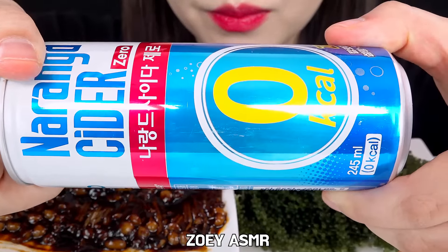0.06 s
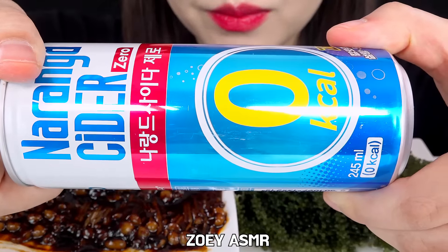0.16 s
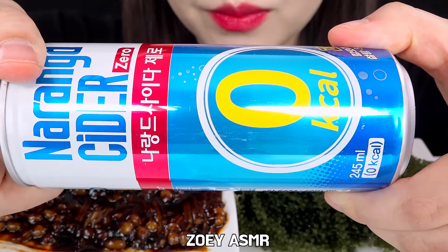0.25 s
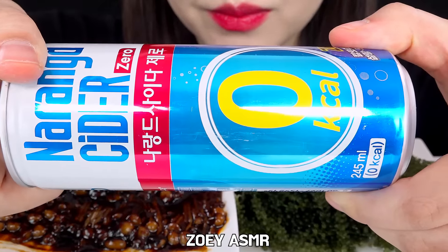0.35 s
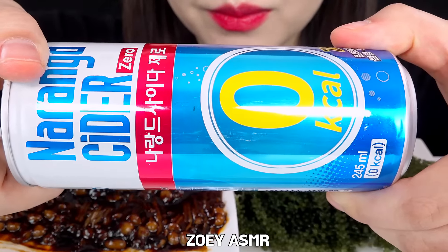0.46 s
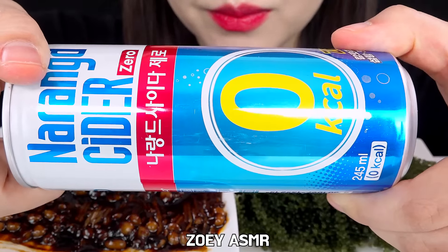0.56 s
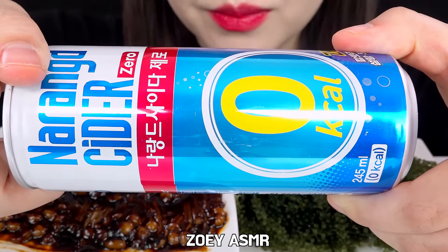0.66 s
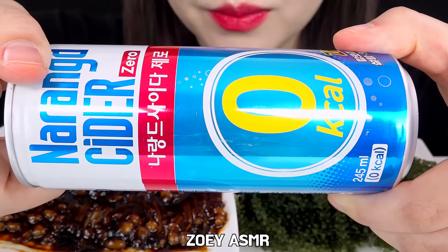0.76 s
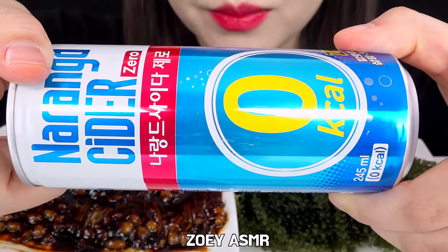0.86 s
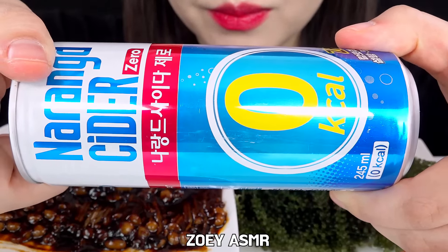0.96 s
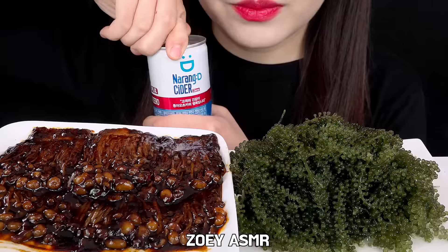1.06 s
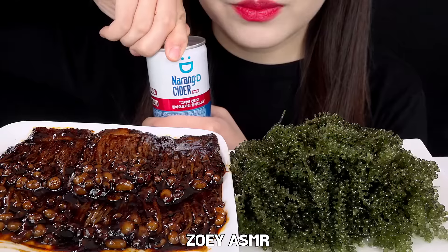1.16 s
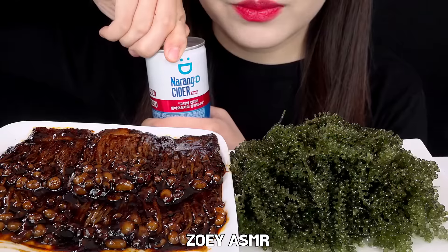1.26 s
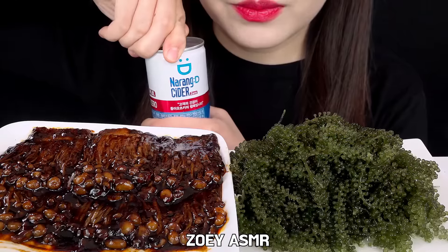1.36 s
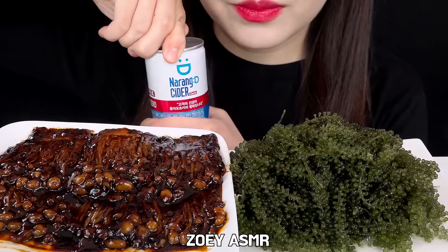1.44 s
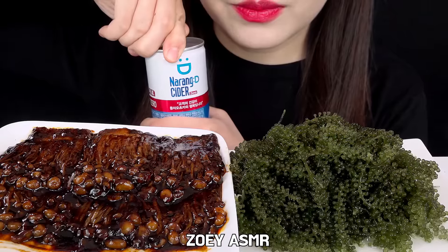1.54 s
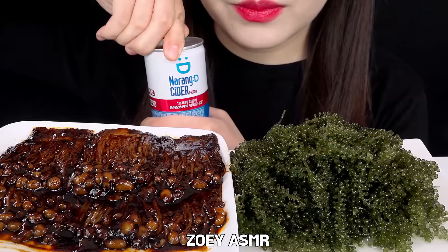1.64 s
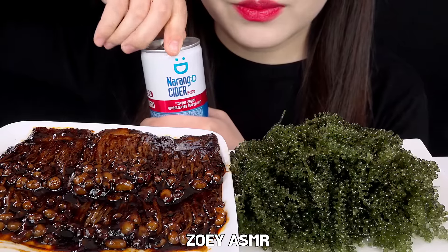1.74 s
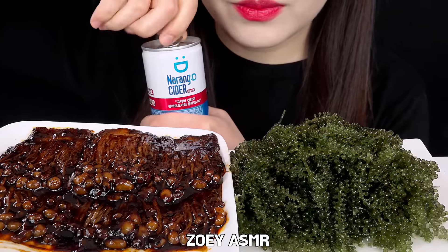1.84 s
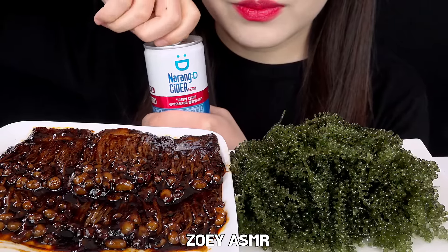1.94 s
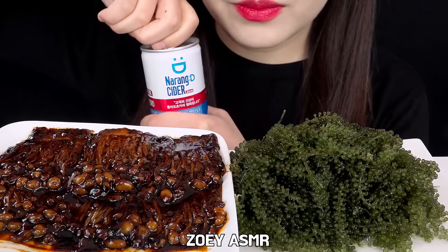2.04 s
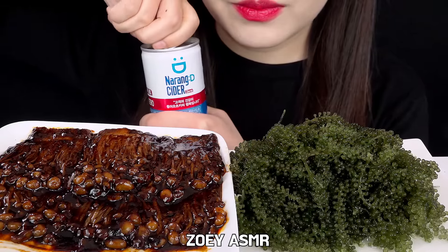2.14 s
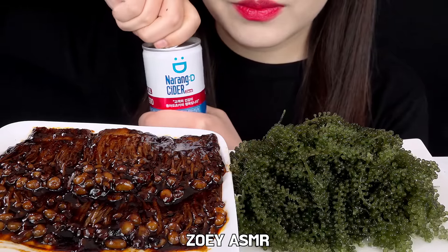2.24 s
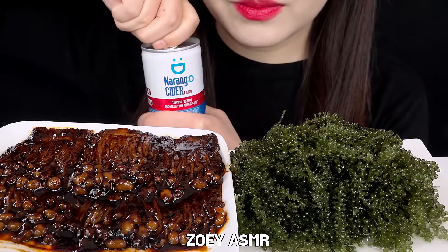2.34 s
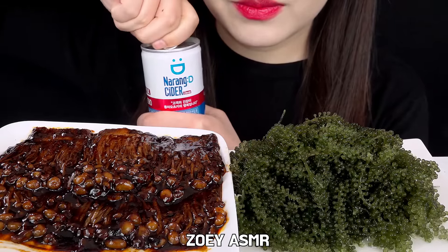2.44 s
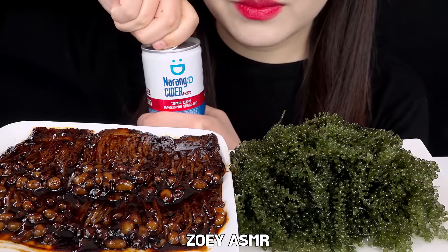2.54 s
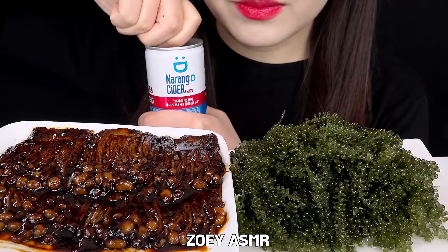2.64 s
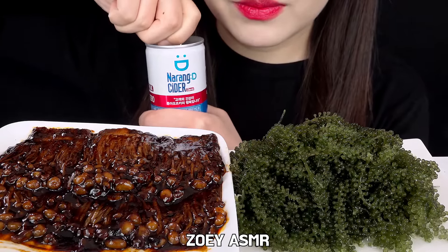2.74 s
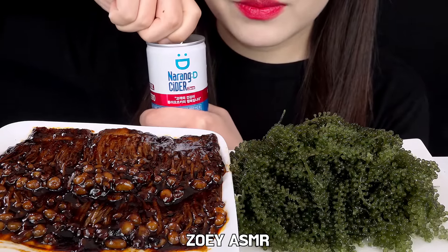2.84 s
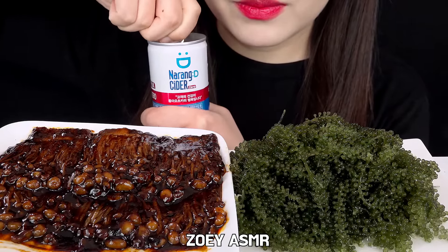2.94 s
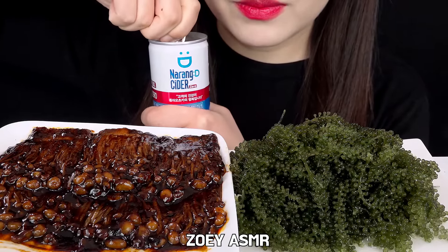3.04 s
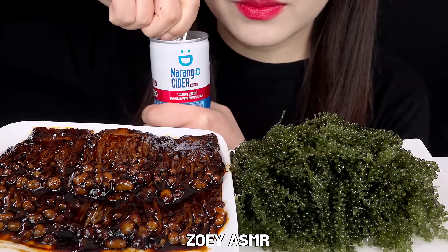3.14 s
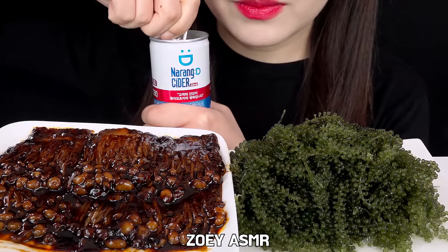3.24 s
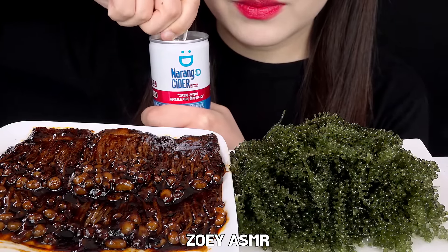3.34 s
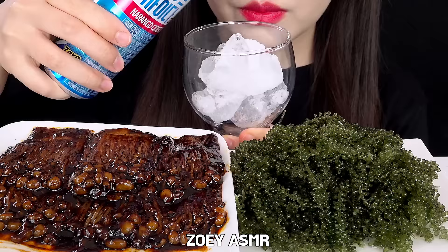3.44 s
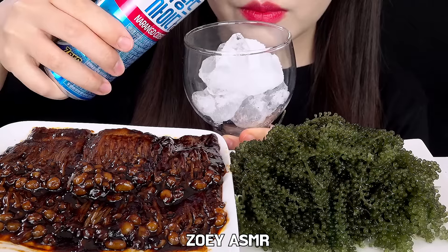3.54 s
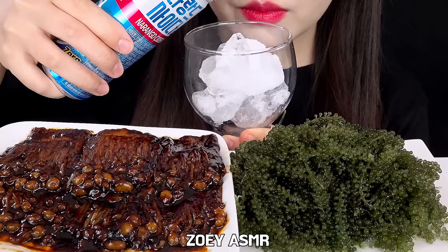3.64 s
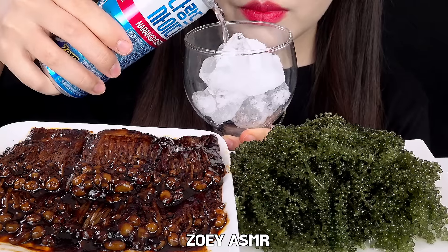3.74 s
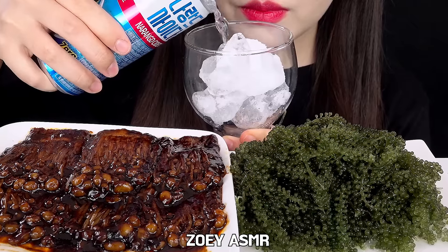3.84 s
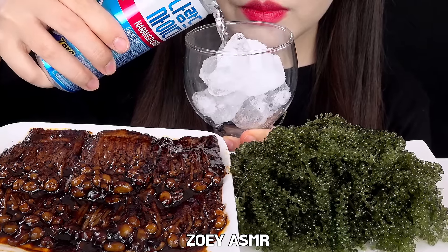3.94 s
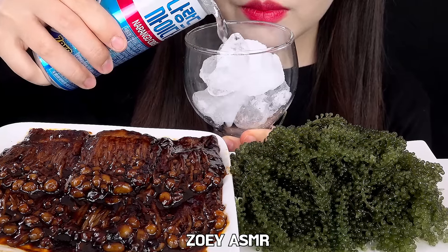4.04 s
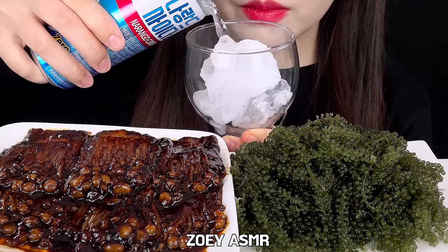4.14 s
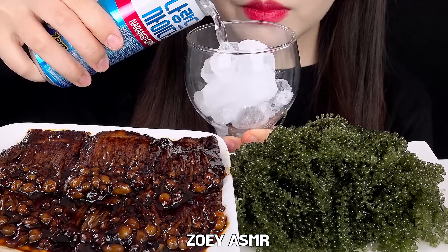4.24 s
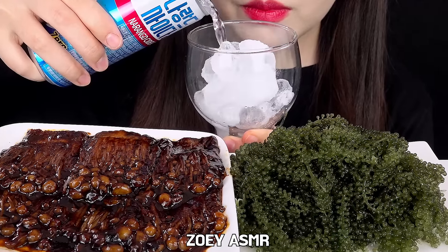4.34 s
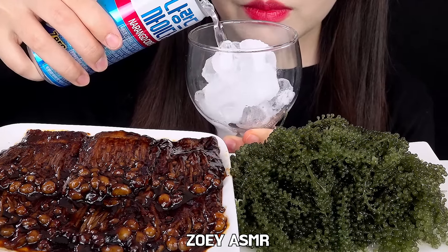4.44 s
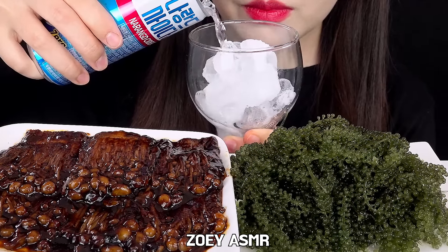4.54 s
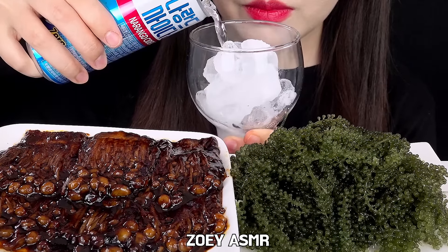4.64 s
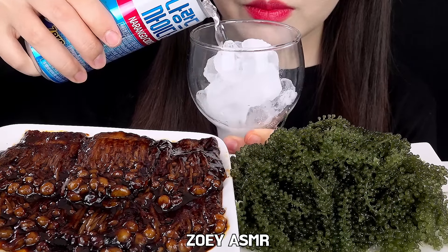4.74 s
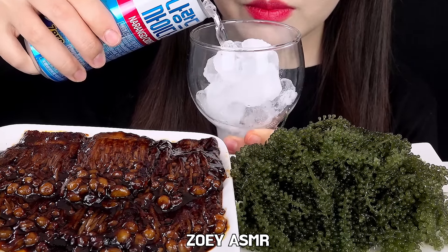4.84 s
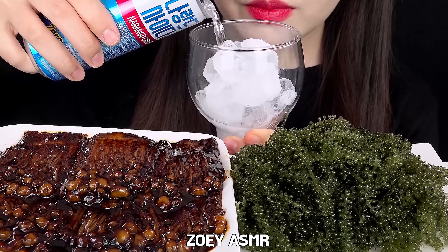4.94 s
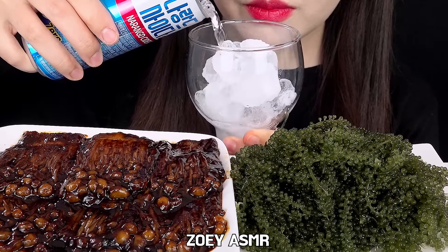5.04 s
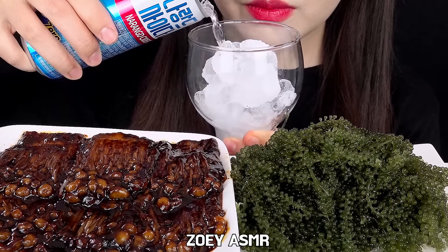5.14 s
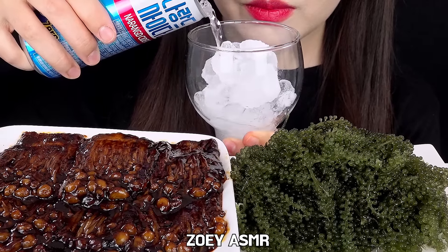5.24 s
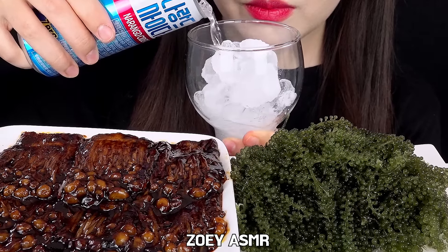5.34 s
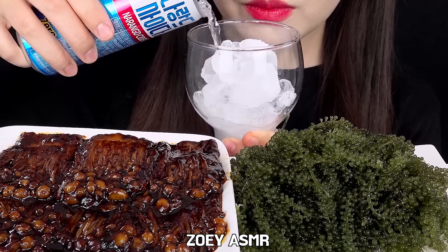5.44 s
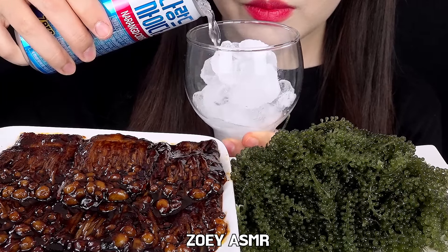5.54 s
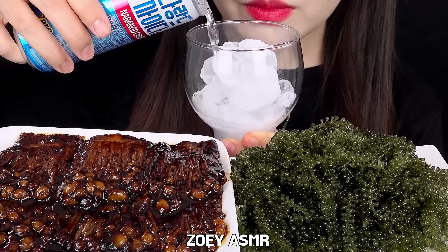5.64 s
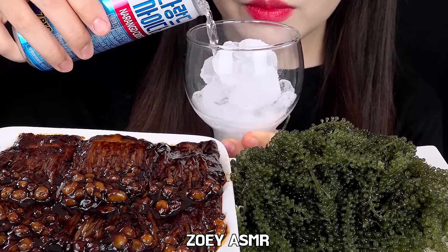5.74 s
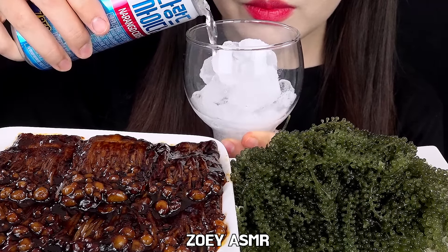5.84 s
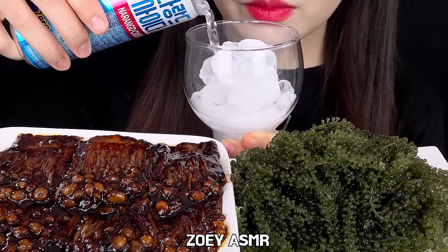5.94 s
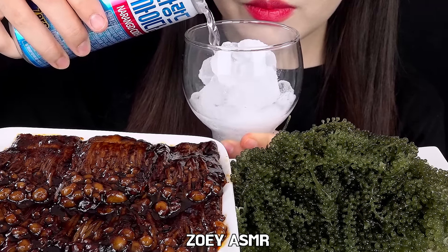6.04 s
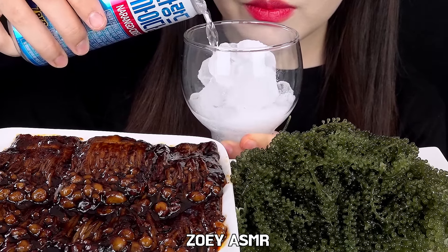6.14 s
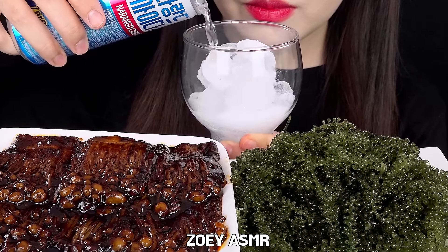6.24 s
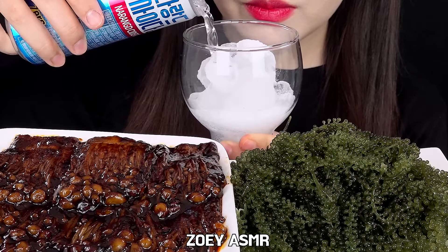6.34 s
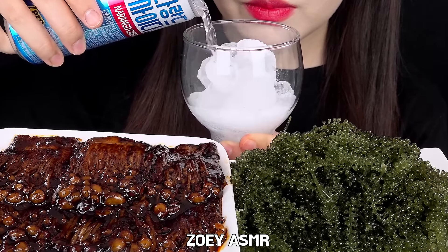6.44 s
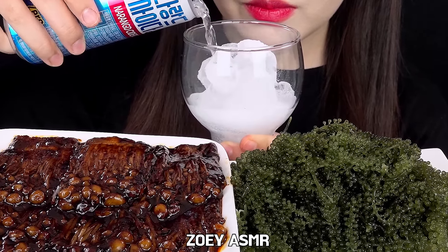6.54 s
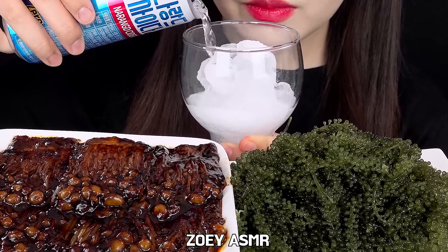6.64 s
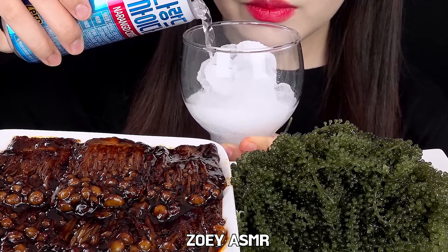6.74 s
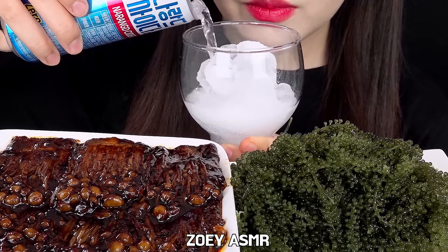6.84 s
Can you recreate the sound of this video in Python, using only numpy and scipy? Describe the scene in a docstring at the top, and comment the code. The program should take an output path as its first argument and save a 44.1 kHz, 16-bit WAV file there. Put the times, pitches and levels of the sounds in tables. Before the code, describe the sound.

Very close microphone, no audible echo. After a second of low rumble and a faint tick, a can cracks open with a short sharp hiss, tinny lid pops and small nail ticks, then a tearing crunch and ringing flap. Fizz builds briefly. Soda then pours over ice in a stemmed glass, splashing, foaming and gurgling, while cubes clack loudly and snap.

```python
"""Soda can opened and poured over ice

A can is opened close to one microphone and poured over ice in a stemmed glass, over rumble and hiss.
Noise jets hiss through the first crack, the lid pops in two bouts of decaying bands as the pressure falls,
then the tab tears it open in a run of tiny clicks and the can fizzes with ringing bubbles.
The stream splashes and foams as clicks in resonances, the lowest rising as the glass fills;
the ice tumbles in clacks and short tones and cracks in filtered snaps."""
import sys
import numpy as np
from scipy import signal
from scipy.fft import rfft, irfft, next_fast_len
from scipy.io import wavfile
from scipy.ndimage import uniform_filter1d

SR = 44100
rng = np.random.default_rng(int(sys.argv[2]) if len(sys.argv) > 2 else 0)


def bounce(signal):
    """Save signal as a 16-bit WAV file at the path given by the first command-line argument."""
    frames = np.transpose(np.atleast_2d(signal))
    limited = np.clip(frames, -1, 1)
    pcm = np.round(limited * 32767).astype(np.int16)
    wavfile.write(sys.argv[1], SR, pcm)


N = 303849
TIME = np.arange(N) / SR
HIT_TIME = TIME[:SR // 2]   # half a second for each hit
POUR_START_S = 3.525   # the can is tipped and the first drops hit the ice

# lowest air resonance of the filling glass: time_s [s], pitch_hz [Hz]
CAVITY = [(4.2, 815), (4.6, 870), (5.0, 972), (6.89, 1079)]
# weaker air modes that a knock stirs: pitch_hz [Hz], width_hz [Hz], level_db [dB]
KNOCK_MODES = [(1397, 98, -7), (2720, 94, 4.5), (3170, 136, -2), (4310, 140, -7.5)]


def amp(db):
    """Decibels to gain."""
    return 10 ** (np.asarray(db) / 20)


def unit(x):
    """Scale to rms 1."""
    return x / np.sqrt(np.mean(x ** 2) + 1e-20)


def level(rows):
    """Gain over time from a dB curve; silent before it."""
    return amp(np.interp(TIME, *np.transpose(rows), left=-200))


def cavity_hz(time_s):
    """Pitch of the lowest air resonance, rising as the air space shrinks."""
    return np.interp(time_s, *np.transpose(CAVITY))


def at_hz(points, hz):
    """Read a table on a log-frequency axis."""
    points = np.array(points)
    return np.interp(np.log(hz), np.log(points[:, 0]), points[:, 1])


def colour(x, spectrum):
    """Causal (minimum-phase) filter with the given spectrum, falling away below its first point."""
    size = 2 * next_fast_len(len(x) // 2 + 2048)
    hz = np.maximum(np.arange(size // 2 + 1) * SR / size, 1)
    low_cut = 1 + (spectrum[0][0] / 2 / hz) ** 2
    gain = amp(at_hz(spectrum, hz)) / low_cut
    # folding the cepstrum onto positive times gives minimum phase
    cepstrum = irfft(np.log(gain))
    cepstrum[1:size // 2] *= 2
    cepstrum[size // 2 + 1:] = 0
    response = np.exp(rfft(cepstrum))
    return irfft(rfft(x, size) * response)[:len(x)]


def resonator(hz, width_hz):
    """Filter coefficients of one resonance with gain 1 on top."""
    r = np.exp(-np.pi * width_hz / SR)
    zeros = np.array([1, 0, -1]) * (1 - r * r) / 2
    poles = [1, -2 * r * np.cos(2 * np.pi * hz / SR), r * r]
    return zeros, poles


def resonance(x, hz, width_hz):
    """One resonance at a steady pitch."""
    return signal.lfilter(*resonator(hz, width_hz), x + 1e-18)


def body(x, modes):
    """Resonances in parallel, signs alternating."""
    return sum((-1) ** k * amp(db) * resonance(x, hz, width) for k, (hz, width, db) in enumerate(modes))


def gliding_resonance(x, hz, width_hz, size=512):
    """A resonance whose centre follows a curve, block by block."""
    out, state = np.zeros(N), np.zeros(2)
    for i in range(0, N, size):
        zeros, poles = resonator(hz[i], width_hz)
        out[i:i + size], state = signal.lfilter(zeros, poles, x[i:i + size], zi=state)
    return out


def add(out, s, sound):
    """Mix a sound in at time s."""
    i = int(round(s * SR))
    out[i:i + len(sound)] += sound[:max(N - i, 0)]


def dying(t60):
    """Envelope of a free decay, 60 dB down after t60 seconds."""
    return amp(-60 * np.minimum(HIT_TIME / t60, 4))


def burst(t60):
    """Noise that starts at rms 1 and dies."""
    return rng.standard_normal(len(HIT_TIME)) * dying(t60)


def grains(per_s, spread_db):
    """Random clicks of either sign and exponentially spread dB sizes, scaled to rms 1."""
    at = np.flatnonzero(rng.random(N) < per_s / SR)
    sizes = amp(spread_db * np.minimum(rng.exponential(1, len(at)), 5))
    out = np.zeros(N)
    out[at] = sizes * rng.choice([-1, 1], len(at))
    return unit(out)


def bubbles(per_s, spread_db, sharpness, count=20):
    """Bubbles of all sizes, each ringing a few cycles; small, high ones are the most numerous."""
    pitches = np.geomspace(250, 15500, count)
    return sum(resonance(grains(per_s * hz / pitches.sum(), spread_db), hz, hz / sharpness) for hz in pitches)


def drift(per_s):
    """A slow random wander of spread about 1."""
    return np.interp(TIME * per_s, np.arange(1000), rng.standard_normal(1000))


def spurt(s, db, hold_s, release_db_per_s, attack_s, sag_db_per_s):
    """Gain over time: attack, a sagging hold, release."""
    age = np.maximum(TIME - s, 0)
    sag_db = sag_db_per_s * np.minimum(age, hold_s)
    release_db = release_db_per_s * np.maximum(age - hold_s, 0)
    attack = 1 - np.exp(-age / attack_s)
    return attack * amp(db - np.minimum(sag_db + release_db, 200))


def build_up(full_s, db, build_db_per_s, creep_db_per_s):
    """Gain over time: a fast build to db at full_s, then a slow creep."""
    slope = np.where(TIME < full_s, build_db_per_s, creep_db_per_s)
    return amp(db + slope * (TIME - full_s))


def taps(events, modes, contact_t60):
    """Short noisy contacts into one set of modes, scaled to their peaks."""
    out = np.zeros(N)
    for s, db in events:
        tap = body(burst(contact_t60), modes)
        add(out, s, amp(db) * tap / np.abs(tap).max())
    return out


def room():
    """Low rumble and soft hiss of coloured noise, with a thin wavering whine at first."""
    # steady background, changing in steps: start_s [s], rumble_db [dB rms], hiss_db [dB rms]
    background = [(0, -30.5, -48.5), (1.09, -42.5, -59), (3.525, -30, -46.5)]
    # noise spectra: pitch_hz [Hz], level_db [dB per Hz, relative]
    rumble_colour = [(25, -25.5), (36, -10.5), (50, 3.5), (65, -3.5), (85, -5), (130, -11.3), (250, -24),
                     (500, -35), (1000, -49.5), (2000, -66)]
    air_colour = [(150, -8.5), (300, 8), (900, -4), (1500, -12.5), (3000, -19), (8000, -26), (16000, -24)]
    starts, rumble_db, air_db = np.transpose(background)
    step = np.searchsorted(starts[1:], TIME)
    # the steps are smoothed over 400 samples
    rumble_gain, air_gain = uniform_filter1d(amp([rumble_db[step], air_db[step]]), size=400)
    rumble = rumble_gain * unit(colour(rng.standard_normal(N), rumble_colour))
    air = air_gain * unit(colour(rng.standard_normal(N), air_colour))
    whine_hz = 1795 + 6 * drift(per_s=40)
    whine = unit(np.sin(2 * np.pi * np.cumsum(whine_hz) / SR))
    whine_end_s, whine_db = 1.08, -66.5
    return rumble + air + amp(whine_db) * whine * (TIME < whine_end_s)


def ticking_tab(count=4):
    """Clear ticks of fingernail and tab ring the lid's modes, with a few faint ones at random."""
    # nail and tab on the lid: start_s [s], peak_db [dB]
    ticks = [(0.7245, -38), (1.137, -48), (1.966, -32), (1.9715, -32), (2.089, -27), (2.2118, -27.5),
             (2.318, -35), (2.3655, -38), (2.4975, -40), (2.5785, -35), (2.6175, -14), (2.6275, -16)]
    # metal modes: pitch_hz [Hz], width_hz [Hz], level_db [dB, relative]
    tab_modes = [(420, 160, 9), (1390, 810, -1), (2580, 430, 3.5), (3730, 170, 6), (4900, 710, -0.5),
                 (8440, 1600, -10.5)]
    # the nail works under the tab
    creak_start_s, creak_end_s, creak_db = 2.16, 2.42, -42.5
    creaks = [(s, creak_db) for s in rng.uniform(creak_start_s, creak_end_s, count)]
    return taps(ticks + creaks, tab_modes, contact_t60=0.01)


def tearing_lid():
    """The score parts in a dense run of tiny fractures, each a click."""
    # metal tears along the score: start_s [s], level_db [dB], hold_s [s], release_db_per_s [dB/s]
    tears = [(1.2395, -19, 0.012, 482), (2.6325, -20, 0.048, 450)]
    # tearing spectrum: pitch_hz [Hz], level_db [dB per Hz, relative]
    tear_colour = [(150, -14), (280, -5.5), (450, -0.5), (800, -4), (2000, -9), (3600, 0.5), (4500, -5),
                   (5400, 4.5), (6800, -6.5), (8500, -4.5), (11000, -12.5), (16000, -16)]
    pull = sum(spurt(*row, attack_s=0.0005, sag_db_per_s=80) for row in tears)
    return pull * unit(colour(grains(per_s=24000, spread_db=0.5), tear_colour))


def escaping_gas():
    """Turbulent gas makes a smooth jet with a faint whistle of the slit, later a weak seep."""
    # last gas seeps under the tab: start_s [s], level_db [dB], hold_s [s], release_db_per_s [dB/s]
    seeps = [(1.966, -37.5, 0.005, 800), (1.975, -51, 0.01, 85), (2.212, -63, 0.17, 220)]
    # gas spectra: pitch_hz [Hz], level_db [dB per Hz, relative]
    jet_colour = [(71, -28.5), (120, -11), (384, -2.5), (709, -5.5), (869, -5.5), (943, -6), (2180, -7),
                  (2410, -4.5), (2960, -10), (5350, -7.5), (7260, -11.5), (8730, -3.5), (11200, -14.5),
                  (14200, -8), (15800, -11)]
    seep_colour = [(500, -17), (1500, -1.5), (2600, 2.5), (3600, -3.5), (5400, -1), (6800, -16),
                   (15000, -23)]
    jet = unit(colour(rng.standard_normal(N), jet_colour))
    whistle = amp(-17) * unit(resonance(rng.standard_normal(N), hz=8500, width_hz=530))
    # the jet swells as the slit widens and sinks as the pressure falls
    start_s, hold_s, arch_db = 1.268, 0.24, 4.5
    arch = amp(arch_db * np.sin(np.pi * np.clip((TIME - start_s) / hold_s, 0, 1)))
    flow = arch * spurt(start_s, -24.8, hold_s, release_db_per_s=1400, attack_s=0.004, sag_db_per_s=0.5)
    leak = sum(spurt(*row, attack_s=0.003, sag_db_per_s=8) for row in seeps)
    seep = unit(colour(grains(per_s=3000, spread_db=4.0), seep_colour))
    return flow * (jet + whistle) + leak * seep


def can_blows(blows, spectrum, t60s, snap_t60):
    """A short snap, then the crowded modes of the can die away, each band at its own rate."""
    out, edges = np.zeros(N), np.geomspace(120, 17000, 9)
    bands = [signal.butter(2, pair, "band", fs=SR, output="sos") for pair in zip(edges, edges[1:])]
    centres = np.sqrt(edges[1:] * edges[:-1])
    for s, ring_db, snap_db, pitch, lift_db in blows:
        # a lid under more pressure is tauter and rings higher; the lift sets its treble
        taut = [(hz * pitch, db + at_hz([(1700, 0), (2800, lift_db)], hz)) for hz, db in spectrum]
        ring = 0
        for band, hz in zip(bands, centres):
            noise = signal.sosfilt(band, rng.standard_normal(len(HIT_TIME)))
            ring = ring + noise * dying(at_hz(t60s, hz))
        ring = colour(ring, taut)
        snap = colour(burst(snap_t60), [(hz, 0.79 * db) for hz, db in spectrum])
        # levels are set on the first 25 ms of the ring and 2.5 ms of the snap
        ring = ring / ring[:SR // 40].std()
        snap = snap / snap[:SR // 400].std() / 2
        add(out, s, amp(ring_db) * ring + amp(snap_db) * snap)
    return out


def popping_lid():
    """The closed lid snaps through as the pressure falls and its modes ring."""
    # pops: start_s [s], ring_db [dB], snap_db [dB, 6 dB above the snap's rms],
    # pitch [ratio to the slack lid], treble_lift_db [dB]
    pops = [(1.4825, -23, -12.5, 1.36, 16), (1.486, -25.5, -40, 1.1, -5), (1.53, -29, -40, 1.13, -5.5),
            (1.7525, -26.5, -3.5, 1.03, -4), (1.763, -31, -17, 0.98, -4), (1.8014, -42, -31, 1.03, -5),
            (1.9012, -53.5, -34.5, 0.94, 18)]
    # ringing spectrum: pitch_hz [Hz], level_db [dB per Hz, relative]
    lid_colour = [(150, -18.5), (290, -5.5), (430, -3), (850, -12), (1250, -4), (1480, 1.5), (1720, 3),
                  (2050, -16), (2550, -26), (3400, -16), (3750, -23), (4600, -32), (6700, -34), (8500, -41),
                  (15000, -55.5)]
    # decay: pitch_hz [Hz], t60_s [s]
    lid_t60 = [(300, 0.3), (1700, 0.24), (4000, 0.19), (12000, 0.13)]
    return can_blows(pops, lid_colour, lid_t60, snap_t60=0.018)


def opening_flap():
    """The flap gives way and the open can rings."""
    # blows: start_s [s], ring_db [dB], snap_db [dB, 6 dB above the snap's rms],
    # pitch [ratio], treble_lift_db [dB]
    flap = [(2.667, -18, -15, 1, -2.5), (2.714, -30.5, -30, 1, -10)]
    # ringing spectrum: pitch_hz [Hz], level_db [dB per Hz, relative]
    open_colour = [(200, -26), (330, -16), (430, -5), (720, -7.5), (960, 2.5), (1150, -7), (2000, -14.5),
                   (2900, -12), (3450, -4), (4700, -23), (7000, -18), (15000, -39)]
    # decay: pitch_hz [Hz], t60_s [s]
    open_t60 = [(400, 0.43), (1000, 0.28), (3500, 0.22), (12000, 0.18)]
    return can_blows(flap, open_colour, open_t60, snap_t60=0.011)


def fizzing_can():
    """Bubbles burst under the lid and sound the air in the can; surges of foam reach its lowest mode."""
    # larger bubbles, each on a surge of foam:
    # time_s [s], burst_peak_db [dB, before the last resonance and trim], surge_db [dB]
    large_bursts = [(3.108, -36, -49), (3.192, -36.5, -51), (3.234, -32, -45), (3.321, -19.5, -68),
                    (3.348, -41, -42), (3.5163, -21.5, -72)]
    # air modes of the can as a spectrum: pitch_hz [Hz], level_db [dB per Hz, relative]
    can_colour = [(600, -24), (1100, -6), (2100, -31), (2800, -12), (3200, 4), (3750, 0), (4400, -15),
                  (5300, 2.5), (6400, -16), (7300, -2), (8300, -5.5), (11000, -16), (16000, -15)]
    # the strongest of them: pitch_hz [Hz], width_hz [Hz], level_db [dB, relative]
    can_modes = [(1080, 53, 3.5), (3420, 160, -13), (5430, 380, -15)]
    fine = unit(colour(bubbles(per_s=6000, spread_db=4.0, sharpness=16, count=48), can_colour))
    surge = unit(resonance(body(grains(per_s=660, spread_db=1.5), can_modes), hz=1110, width_hz=690))
    burst_taps = taps([(s, db) for s, db, _ in large_bursts], can_modes, contact_t60=0.0019)
    bursts = resonance(burst_taps, hz=1140, width_hz=720)
    fizz = build_up(full_s=3.05, db=-60.5, build_db_per_s=56, creep_db_per_s=12) * (TIME < POUR_START_S)
    surges = np.zeros(N)
    for s, _, db in large_bursts:
        # rises at 420 dB/s to the burst, then falls at 600 dB/s
        surges += amp(db - np.maximum(420 * (s - TIME), 600 * (TIME - s)))
    return fizz * (fine + amp(-11.5) * surge) + surges * surge + amp(-2.0) * bursts


def trickling():
    """The first trickle runs over bare ice until the pool covers it: clicks ring narrow modes."""
    # modes: pitch_hz [Hz], width_hz [Hz], level_db [dB, relative]
    trickle_modes = [(799, 32, 8.5), (947, 53, 6), (1730, 170, -10), (2750, 57, 5.5), (3630, 90, -9),
                     (4440, 82, -5), (6950, 480, -10.5)]
    # a negative sag makes it grow
    bare_ice = spurt(POUR_START_S, db=-48.5, hold_s=0.85, release_db_per_s=50, attack_s=0.005,
                     sag_db_per_s=-14)
    return bare_ice * unit(body(grains(per_s=2800, spread_db=6.5), trickle_modes))


def jostling(second_hz, width_hz):
    """The stream nudges the cubes; light random touches ring the air modes of the glass."""
    touches = grains(per_s=45, spread_db=2.5)
    low = gliding_resonance(touches, cavity_hz(TIME), width_hz)
    second = resonance(touches, second_hz, width_hz)
    return amp(-7) * unit(amp(-1) * low + second + amp(-3) * body(touches, KNOCK_MODES))


def splashing():
    """Drops sound the air in the glass, whose lowest resonance rises as it fills."""
    # upper air resonances: pitch_hz [Hz], width_hz [Hz], level_db [dB, relative]
    glass_modes = [(1160, 90, -5.5), (1890, 140, 1), (2533, 230, -3), (4430, 260, -9)]
    drops = grains(per_s=2500, spread_db=1.0)
    low_air = gliding_resonance(drops, cavity_hz(TIME), width_hz=144)
    upper_air = body(grains(per_s=2500, spread_db=3.5), glass_modes)
    splash = unit(low_air) + amp(-0.25) * unit(upper_air) + jostling(second_hz=1946, width_hz=100)
    return build_up(full_s=4.5, db=-30.7, build_db_per_s=41, creep_db_per_s=4.3) * splash


def foaming(wetting):
    """Bursting foam bubbles crackle, and longer-ringing ones ping above the splash."""
    # foam spectrum: pitch_hz [Hz], level_db [dB per Hz, relative]
    foam_colour = [(150, 6), (280, -12), (700, -10.5), (1500, -9), (2200, -7), (2800, 2.5), (4500, -1),
                   (5500, -3), (7700, -2.5), (9000, -9), (12000, -13.5), (16000, -23)]
    crackle = unit(colour(bubbles(per_s=16000, spread_db=-0.5, sharpness=4.1), foam_colour))
    pings = unit(colour(bubbles(per_s=1800, spread_db=3, sharpness=26, count=56), foam_colour))
    growth = build_up(full_s=4.5, db=-23.5, build_db_per_s=47.5, creep_db_per_s=1.8)
    return np.maximum(growth, wetting) * (amp(-1.84) * crackle + amp(-8) * pings)


def spraying(wetting):
    """Fine high spray: a dense crowd of very short bubble rings."""
    # spray spectrum: pitch_hz [Hz], level_db [dB per Hz, relative]
    spray_colour = [(4000, -14), (8000, 0.5), (9500, 2.5), (12000, -1), (16000, -0.5)]
    growth = build_up(full_s=4.25, db=-34.8, build_db_per_s=41, creep_db_per_s=1.1)
    fine = unit(colour(bubbles(per_s=24000, spread_db=5.0, sharpness=2), spray_colour))
    return np.maximum(growth, amp(-4) * wetting) * fine


def plop(hz, cycles, rise):
    """A bubble rings for some cycles and rises in pitch as it nears the surface."""
    life = np.arange(int(cycles / hz * SR)) * hz / (cycles * SR)   # 0 to 1
    tone = np.sin(2 * np.pi * cycles * life * (1 + rise * life))
    return tone * amp(-60 * life) * (1 - np.exp(-2 * cycles * life))


def gurgling(per_s, low_hz, high_hz, spread_db):
    """The stream drags air under: a few big plops and a random run of smaller ones."""
    # single bubbles pinch off and ring: start_s [s], level_db [dB, before a 0.5 dB cut], pitch_hz [Hz]
    plops = [(3.931, -19, 714), (4.082, -18, 510), (4.595, -8, 710), (6.338, -10.5, 330), (6.392, -11, 497),
             (6.641, -7.5, 844), (6.75, -8, 420), (6.785, -10, 520)]
    # level of the small ones: time_s [s], level_db [dB]
    gurgle = [(3.53, -67), (4.0, -43), (4.7, -33.5), (5.0, -44.5), (6.0, -43), (6.4, -30), (6.89, -29.5)]
    big, small = np.zeros(N), np.zeros(N)
    for s, db, hz in plops:
        add(big, s, amp(db - 0.5) * plop(hz, cycles=8 + hz / 45, rise=0.08))
    for when, size, strength in rng.random((int(per_s * N / SR), 3)):
        hz = low_hz * (high_hz / low_hz) ** size
        add(small, when * N / SR, amp(-spread_db * strength) * plop(hz, cycles=18.0, rise=0.3))
    return big + level(gurgle) * unit(small)


def pouring():
    """The stream trickles, splashes, foams, sprays and gurgles into the glass."""
    started = TIME > POUR_START_S
    # the first drops sizzle briefly on the dry ice
    wetting = spurt(POUR_START_S, db=-49.5, hold_s=0, release_db_per_s=53, attack_s=0.004, sag_db_per_s=0)
    wobble = amp(1.0 * drift(per_s=28))   # the stream wavers over the ice
    stream = wobble * (splashing() + foaming(wetting)) + spraying(wetting)
    gurgles = gurgling(per_s=220, low_hz=361.5, high_hz=836, spread_db=8)
    return trickling() + started * stream + gurgles


def ice_cracks(snap_t60, width_hz, snap_db):
    """A sharp split of ice in the warmer drink, with a brief ping of the cube."""
    # cracks: start_s [s], peak_db [dB, before a 2 dB lift], pitch_hz [Hz]
    cracks = [(3.9093, -18, 5300), (4.246, 0.5, 8450), (4.3553, -16.5, 7600), (4.454, -12.5, 4100),
              (4.555, -7.5, 6500), (4.5675, -3.5, 4430), (4.664, -6, 4570), (4.7683, -7, 3990),
              (4.8407, -1.5, 7520), (5.2305, -9, 7200), (5.339, -2, 4820), (5.9695, -9, 14500),
              (5.9707, -8, 2950), (5.971, -4, 8700), (6.2663, -7, 4600)]
    out = np.zeros(N)
    for s, db, hz in cracks:
        snap = burst(snap_t60)
        crack = resonance(snap, hz, width_hz) + amp(snap_db) * resonance(snap, hz=6200, width_hz=2300)
        add(out, s, amp(db) * crack / np.abs(crack).max())
    return amp(2.0) * out


def ice_knocks(second_hz, low_t60, second_t60, clack_t60, rise_s):
    """Cubes shift in short rattles; each contact clacks and rings the air of the glass, a little detuned."""
    # shifts: start_s [s], length_s [s], low_mode_db and second_mode_db [dB, before a 1 dB cut],
    # clack_db [dB, before the clack and ring trims]
    knocks = [(3.973, 0, -28, -25, -40), (4.029, 0, -10, -5, -21), (4.08, 0.0025, -18, -27, -27),
              (4.0927, 0.00033, 0, -3.5, -19), (4.2113, 0, -6.5, -10, -7.5), (4.2205, 0.01, -1, -6, -12),
              (4.239, 0.013, 6.5, -7, -1.5), (4.2585, 0.0079, -4, 7.5, 0.5), (4.273, 0.005, 0.5, -6, -6),
              (4.367, 0, -11.5, -6.5, -15.5), (4.411, 0.005, -14, -16, -24),
              (4.5275, 0.016, -11.5, -6, -15), (4.555, 0.0076, -0.5, -12, -8), (4.648, 0, -24, -10, -24),
              (4.6595, 0.0045, -3, 4.5, -8.5), (4.695, 0, -8, -8, -25), (4.753, 0, -14, -10, -20),
              (4.768, 0.00068, -13, -2.5, -10), (4.837, 0, 3, -8, -8.5), (4.868, 0, -18, -17, -17.5),
              (5.1124, 0.011, -13, -12, -22), (5.273, 0.00025, -5, -4, -13), (5.642, 0.013, -10, -5, -13.5),
              (6.266, 0, -22, -3, -5.5), (6.336, 0.00031, 8.5, 2.5, -1), (6.352, 0.016, -3.5, -11, -9)]
    # contact spectrum: pitch_hz [Hz], level_db [dB per Hz, relative]
    clack_colour = [(120, -14.5), (300, -5), (600, 1.5), (1000, 3), (1400, 0.5), (2000, 0), (2900, 5),
                    (3600, -7.5), (4400, -1), (6000, -9.5), (9000, -16.5), (16000, -21)]
    contact_gap_s, force_spread_db = 0.0052, 2   # within one rattle
    out, swell = np.zeros(N), 1 - np.exp(-HIT_TIME / rise_s)
    for s, length_s, low_db, second_db, clack_db in knocks:
        for at in s + np.linspace(0, length_s, 1 + round(length_s / contact_gap_s)):
            contact = burst(clack_t60)
            low_shift, second_shift = 1 + rng.standard_normal(2) * [0.04, 0.02]
            force = amp(force_spread_db * rng.uniform(-1, 1))
            low_tone = np.sin(2 * np.pi * cavity_hz(s) * low_shift * HIT_TIME)
            low = amp(low_db - 1) * low_tone * dying(low_t60)
            second_tone = np.sin(2 * np.pi * second_hz * second_shift * HIT_TIME)
            second = amp(second_db - 1) * second_tone * dying(second_t60)
            clack, ring = colour(contact, clack_colour), body(contact, KNOCK_MODES)
            # both are scaled on their first 5 ms
            clack = amp(-4.5) * clack / clack[:SR // 200].std()
            ring = amp(-9.5) * ring / ring[:SR // 200].std()
            add(out, at, force * (swell * (low + second) + amp(clack_db) * (clack + ring)))
    return out


def scene():
    """Everything reaches one close microphone, carried alike on both channels."""
    lid = ticking_tab() + tearing_lid() + popping_lid() + opening_flap()
    can = lid + escaping_gas() + fizzing_can()
    cracks = ice_cracks(snap_t60=0.014, width_hz=470, snap_db=-13.5)
    knocks = ice_knocks(second_hz=1980, low_t60=0.028, second_t60=0.03, clack_t60=0.028, rise_s=0.0004)
    return np.tile(room() + can + pouring() + cracks + knocks, (2, 1))


def record(dry):
    """The loudest knocks overload at full scale; a steep filter then cuts the top."""
    clipped = dry / (1 + dry ** 8) ** (1 / 8)
    top_cut = signal.ellip(10, 0.1, 70, 15900, fs=SR, output="sos")   # cutoff in Hz
    return signal.sosfilt(top_cut, clipped)


dry = scene()
out = record(dry)
bounce(out)
```